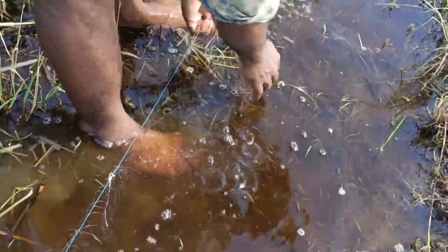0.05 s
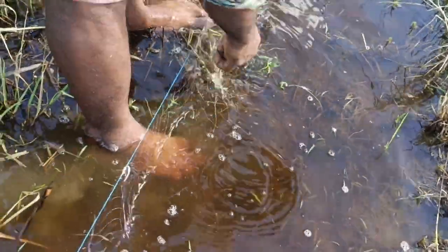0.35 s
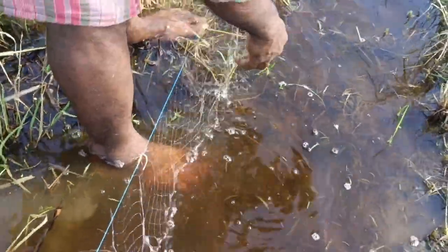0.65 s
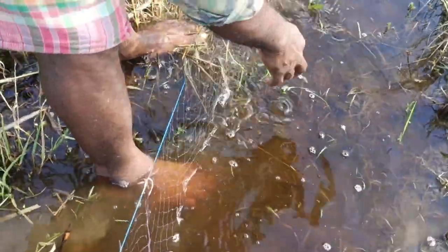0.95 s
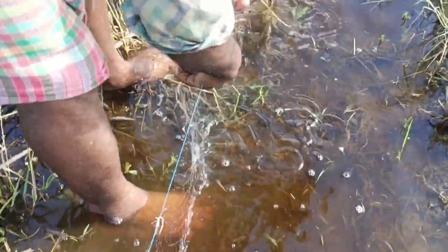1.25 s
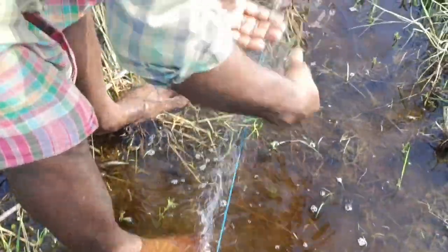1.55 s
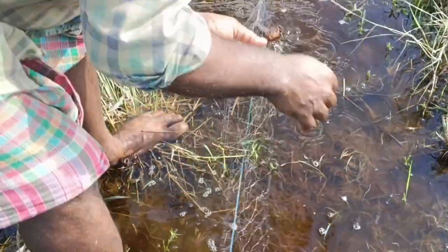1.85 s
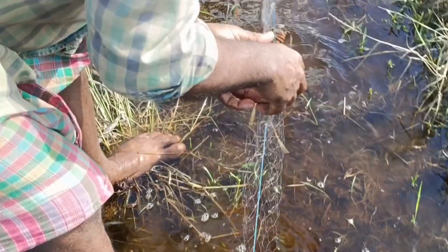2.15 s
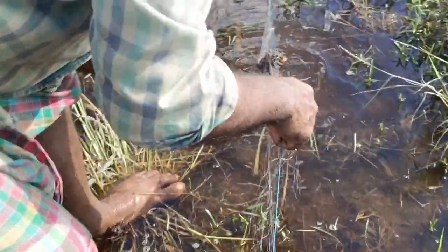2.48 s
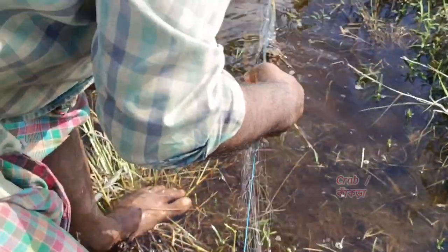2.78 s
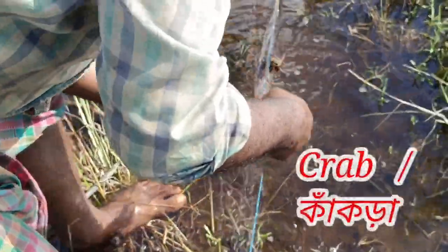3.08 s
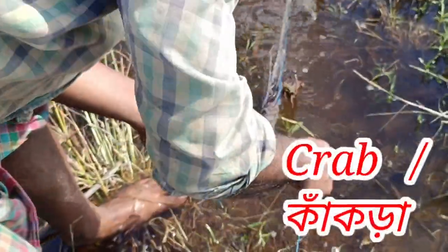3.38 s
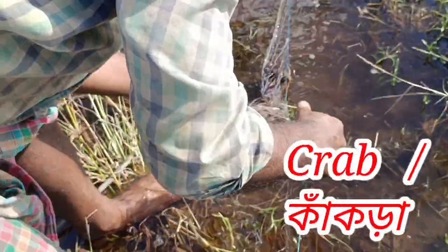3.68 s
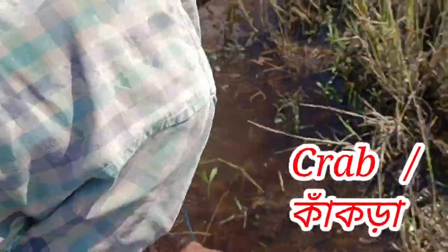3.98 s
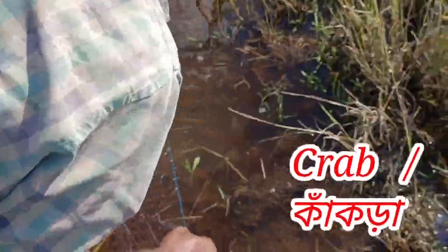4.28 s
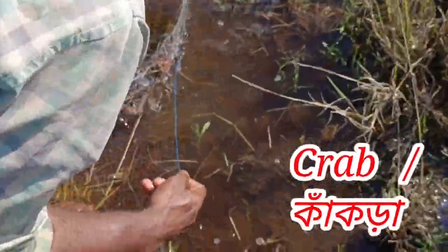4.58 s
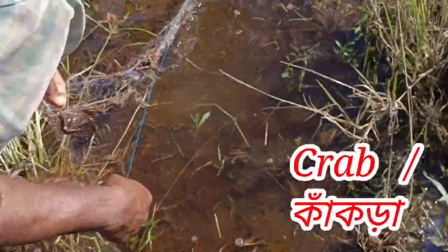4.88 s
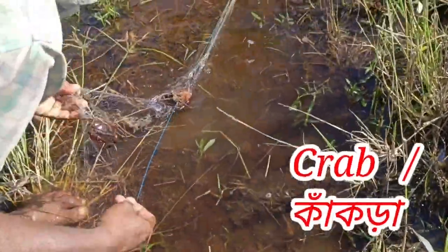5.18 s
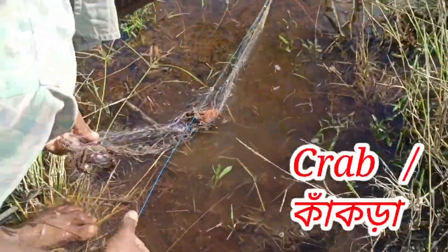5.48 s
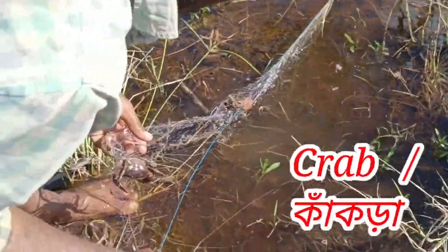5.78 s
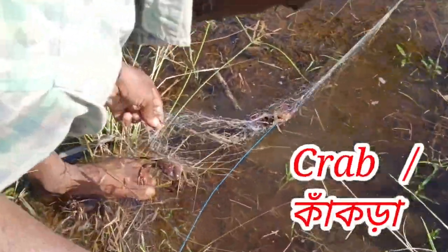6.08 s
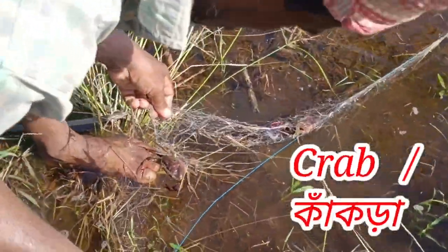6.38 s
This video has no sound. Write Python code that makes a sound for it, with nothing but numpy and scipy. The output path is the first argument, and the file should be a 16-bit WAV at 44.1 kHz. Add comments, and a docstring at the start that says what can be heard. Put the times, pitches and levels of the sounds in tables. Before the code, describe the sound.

Shallow water drips, plops and splashes as a fishing net is hauled by hand, then rustles over wet grass in light wind.

```python
"""Hauling a gill net through a flooded field

Water falls from the hand-hauled mesh, slaps the shallows and traps ringing bubbles;
later the net rustles over wet grass. An insect chirps in the reeds and another buzzes lower.
Light wind rumbles on the microphone, over a far hiss and a faint drone."""
import sys
import numpy as np
from scipy import signal
from scipy.io import wavfile
from scipy.ndimage import uniform_filter1d

SR = 44100
rng = np.random.default_rng(int(sys.argv[2]) if len(sys.argv) > 2 else 0)


def persist_wave(psi):
    """Save psi, clipped to +-1, as 16-bit WAV."""
    counts = np.round(np.clip(psi, -1, 1) * 32767).astype(np.int16)
    wavfile.write(sys.argv[1], SR, np.atleast_2d(counts).T)


N = 288414
TIME = np.arange(N) / SR

# Stereo likeness of airborne noise: (frequency [Hz], left-right correlation [-1..1])
AIR_CORRELATION = [(500, -0.13), (1400, -0.69), (3000, 0.17), (15000, -0.23)]
# Tugs that stir the water: (start [s], length [s], level [dB])
NET_TUGS = [(.42, 0.025, -57.5), (.62, 0.18, -65), (2.015, 0.01, -42), (2.725, 0.012, -40.5),
            (2.83, 0.02, -43.5), (3.81, 0.13, -50), (4.15, 0.09, -52.5), (4.635, 0.0054, -41.5),
            (4.772, 0.028, -48.5), (5.16, 0.091, -42), (5.87, 0.014, -44.5), (5.92, 0.2, -56),
            (6.285, 0.11, -37)]
# Lifts that shed spray and drips: (start [s], length [s], level [dB])
NET_LIFTS = [(.42, 0.091, -66), (.6, 0.44, -77), (1.92, 0.18, -55), (2.25, 0.7, -72), (2.8, 0.032, -65),
             (3.83, 0.165, -62), (4.22, 0.15, -60)]


def from_db(db):
    """Decibels to gain."""
    return 10 ** (np.asarray(db) / 20)


def rms_one(x):
    """Scale to unit rms."""
    return x / np.sqrt(np.mean(x ** 2) + 1e-20)


def at_hz(points, hz):
    """Interpolate a spectrum over log frequency."""
    points_hz, values = np.transpose(points)
    return np.interp(np.log(hz), np.log(points_hz), values)


def band(x, low_hz, high_hz, order=2):
    """Butterworth band-pass."""
    sos = signal.butter(order, [low_hz, min(high_hz, .45 * SR)], "band", fs=SR, output="sos")
    return signal.sosfilt(sos, x + 1e-18)


def drift(rate_hz):
    """Slow random wander, unit rms."""
    hop, settle = 40, 2000
    pole = np.exp(-2 * np.pi * rate_hz * hop / SR)
    white = rng.standard_normal(N // hop + settle + 2)
    slow = signal.lfilter([1], [1, -2 * pole, pole * pole], white)[settle:]
    return np.interp(np.arange(N) / hop, np.arange(len(slow)), rms_one(slow))


def pan(left_db):
    """Channel gains for a left-minus-right level."""
    return from_db(np.array([[left_db], [-left_db]]) / 2)


def add(out, start_s, sound):
    """Mix in a short sound."""
    i = int(np.clip(start_s * SR, 0, N - 1))
    out[..., i:i + sound.shape[-1]] += sound[..., :N - i]


def swell(start_s, length_s, rise_s, fall_s):
    """Rise, hold from start_s, fall; rise_s and fall_s are per 20 dB."""
    gain = np.zeros(N)
    on = (TIME > start_s - 3 * rise_s) & (TIME < start_s + length_s + 3 * fall_s)
    t = TIME[on] - start_s
    gain[on] = from_db(20 * (np.minimum(t, 0) / rise_s - np.maximum(t - length_s, 0) / fall_s))
    return gain


def swells(rows, rise_s, fall_s):
    """Summed swells from rows of (start [s], length [s], level [dB])."""
    return sum(from_db(db) * swell(s, length_s, rise_s, fall_s) for s, length_s, db in rows)


def activity(rows, rise_s, fall_s):
    """Vigour of the gestures: 1 in the strongest, dying to 0 between them."""
    top_db = max(db for _, _, db in rows)
    each = [from_db((db - top_db) / 2) * swell(s, length_s, rise_s, fall_s) for s, length_s, db in rows]
    return np.max(each, axis=0)


def coloured(spectrum, correlation, low_hz, high_hz, bands, flicker_db=0):
    """Unit-rms stereo noise; each band has its own level, correlation and optional flicker."""
    out = 0
    edges_hz = np.geomspace(low_hz, high_hz, bands + 1)
    white = rng.standard_normal((2, 2, N))
    for k, (low, high) in enumerate(zip(edges_hz, edges_hz[1:])):
        mid, side = band(white[k % 2], low, high)
        hz = np.sqrt(low * high)
        alike = np.clip(at_hz(correlation, hz), -1, 1)
        stereo = np.sqrt(1 + alike) * mid + np.sqrt(1 - alike) * side * [[1], [-1]]
        db = at_hz(spectrum, hz) + (flicker_db * drift(22) if flicker_db else 0)
        out = out + from_db(db) * stereo
    return rms_one(out)


def grains(per_s, spread_db):
    """Random clicks of uneven size and sign."""
    sizes = from_db(spread_db * np.minimum(rng.exponential(1, N), 4)) * rng.choice([-1, 1], N)
    return sizes * (rng.random(N) < per_s / SR)


def bubble(hz, t60_s, rise):
    """Trapped air swells within a cycle and rings; rise > 0 lifts the pitch as it nears the surface."""
    t = np.arange(int(max(t60_s, .002) * SR)) / SR
    envelope = (1 - np.exp(-t * hz / .7)) * from_db(-60 * (t / t60_s) ** 1.5)
    cycles = hz * (t + rise * t * (t / t60_s / 2 - .2))
    return envelope * np.sin(2 * np.pi * cycles)


def surroundings(x, left_db, bend_hz, scatter, tail, port_lag_s=.0001):
    """Sound bends round to the right microphone port, lagging; legs, water and reeds scatter it.
    scatter, tail: (level [dB], T60 [s])."""
    pole = np.exp(-2 * np.pi * bend_hz / SR)
    bent = signal.lfilter([-pole, 1], [1, -pole], x + 1e-18)  # all-pass
    direct = np.stack([x, np.interp(TIME - port_lag_s, TIME, bent)])
    t = np.arange(SR // 3) / SR
    response = 0
    for db, t60_s in scatter, tail:
        echoes = rng.standard_normal((2, len(t))) * from_db(-60 * t / t60_s) * (t > .0005)
        response = response + from_db(db) * rms_one(echoes) / np.sqrt(len(t))
    scattered = signal.fftconvolve(x[None], response, axes=1)[:, :N]
    return pan(left_db) * (direct + scattered)


def wind():
    """Eddies press on the two microphone ports; each gust favours one side."""
    # Eddy spectrum: (frequency [Hz], relative density [dB])
    spectrum = [(13, -36), (22, -15), (54, -3), (114, -2), (160, -9.5), (200, -7.5), (280, -11.5),
                (320, -14.5), (353, -18), (420, -22.5), (550, -57)]
    # Likeness at the ports: (frequency [Hz], left-right correlation [-1..1])
    correlation = [(30, 0.041), (70, 0.59), (130, 0.78), (300, 0.42)]
    # Breeze strength: (time [s], level [dB])
    breeze_curve = [(0.0, -54), (0.31, -44), (0.49, -49.5), (0.98, -42.5), (3.57, -46), (3.62, -44.5),
                    (3.88, -43), (4.77, -44.5), (4.9, -54.5), (4.97, -45.5), (5.23, -59), (5.39, -47.5),
                    (6.34, -47), (6.54, -53)]
    # Gusts on top: (start [s], length [s], level [dB], left minus right [dB])
    gust_rows = [(0.39, 0.056, -35.5, 1), (1.606, 0.012, -26.5, 16), (1.943, 0.071, -28.5, -30),
                 (2.267, 0.018, -30.5, -1), (2.347, 0.089, -33.5, -11), (2.668, 0.049, -36.5, -8),
                 (3.1, 0.093, -30, 9), (3.244, 0.38, -36, 6), (3.619, 0.032, -22.5, 30),
                 (3.73, 0.097, -35.5, 15), (4.541, 0.05, -35.5, -5), (4.731, 0.085, -34.5, -1.5),
                 (4.988, 0.03, -36.5, 2), (5.298, 0.0064, -35, 2), (5.777, 0.041, -32.5, 7),
                 (6.14, 0.037, -33.5, 25), (6.263, 0.21, -40.5, 4)]
    air = coloured(spectrum, correlation, 20.9, 416, bands=12)
    breeze = from_db(np.interp(TIME, *np.transpose(breeze_curve)))
    gusts = sum(from_db(db - 1.5) * rms_one(pan(left_db)) * swell(s, length_s, .046, .046)
                for s, length_s, db, left_db in gust_rows)
    rumble = np.hypot(gusts, breeze * from_db(3 * drift(14))) * rms_one(band(air, 30, 97.4, order=3))
    flutter = np.hypot(from_db(-14) * gusts, breeze) * rms_one(band(air, 113, 366.5, order=6))
    return rumble + flutter


def field(fade_db_per_s=.5):
    """Far hiss, slowly fading, under steady top hiss and a distant insect chorus."""
    # Far hiss spectrum: (frequency [Hz], relative density [dB])
    spectrum = [(400, 2), (520, -7), (700, -13.5), (1000, -13), (1500, -6.5), (1850, -10.5), (2250, -5.5),
                (2800, -14), (3600, -20.5), (5000, -34.5), (7000, -33)]
    air = coloured(spectrum, AIR_CORRELATION, 388, 7310, bands=16)
    air *= from_db(-56 - fade_db_per_s * TIME)
    top = rms_one(band(rng.standard_normal((2, N)), 12800, 24400))
    chorus = band(rng.standard_normal((2, N)), 8800, 9300, order=1)
    chorus = rms_one(band(chorus, 7800, 11000))
    return air * pan(2.1) + from_db(-70.5) * top + from_db(-64.5) * chorus * pan(4.1)


def drone(half_width_hz=6):
    """Two far, wavering low tones of narrow-band noise."""
    # Drone tones: (frequency [Hz], level [dB])
    tones = [(184, -56.5), (285, -60)]
    return sum(from_db(db) * rms_one(band(rng.standard_normal(N), hz - half_width_hz, hz + half_width_hz))
               for hz, db in tones)


def buzzing_insect():
    """Short rasps, pitched below the chirps."""
    # Rasps: (start [s], length [s], level [dB])
    rasps = [(0, 0.13, -71), (2.35, 0.11, -68), (3.72, 0.07, -72)]
    buzz = rms_one(band(rng.standard_normal((2, N)), 7800, 8400))
    return swells(rasps, rise_s=.043, fall_s=.04) * buzz * pan(15)


def chirping_insect(period_s=.1, duty=.78, strokes_per_s=137, top_hz=9350, fall_hz=858):
    """Each chirp is a run of wing strokes that glide down, blurred by the reeds."""
    # Phrases: (start [s], length [s], level [dB])
    trills = [(0.008, 0.92, -63), (0.912, 0.65, -62.5), (1.52, 0.42, -55), (2.21, 0.73, -68.5),
              (4.031, 0.27, -52.5)]
    chirps = 0
    for start_s, length_s, db in trills:
        singing = (TIME - start_s) / period_s % 1 < duty
        chirps = chirps + from_db(db) * swell(start_s, length_s, rise_s=.022, fall_s=.012) * singing
    stroke_phase = np.cumsum(strokes_per_s * (1 + .025 * drift(10))) / SR % 1
    hz = top_hz - fall_hz * stroke_phase + 70 * drift(300) + 45 * drift(8)
    wings = rms_one(np.sin(np.pi * stroke_phase) ** 2 * np.sin(2 * np.pi * np.cumsum(hz) / SR))
    waver_db = drift(1.4) + 2 * drift(52)
    song = uniform_filter1d(chirps, size=1100) * from_db(.5 + waver_db) * wings
    return surroundings(song, left_db=12, bend_hz=3000, scatter=(-4, .03), tail=(-10, .2))


def drips(idle_db=-55.5, moving_db=-40, spread_db=2.5, low_hz=1500, high_hz=4800):
    """Drops fall from the mesh, more and larger while it moves; each ticks and rings briefly."""
    out = np.zeros(N)
    t = np.arange(SR // 200) / SR
    lifted = activity(NET_LIFTS, rise_s=.06, fall_s=.22)
    tugged = activity(NET_TUGS, rise_s=.06, fall_s=.22)
    per_s = 3.4 + 190 * lifted + 120 * tugged
    level_db = idle_db + (moving_db - idle_db) * np.maximum(lifted, tugged)
    falls = np.flatnonzero(rng.random(N) < per_s / SR)
    for i, (size, pitch, ring) in zip(falls, rng.random((len(falls), 3))):
        hz = low_hz * (high_hz / low_hz) ** (pitch ** 1.3)
        gain = from_db(level_db[i] + spread_db * min(-np.log(1 - size), 3))
        cycles = 4 + 16 * ring
        tick = from_db(-22) * rng.standard_normal(len(t)) * np.exp(-t / .0004)
        add(out, TIME[i], gain * bubble(hz, cycles / hz, rise=ring / 2))
        add(out, TIME[i], gain * tick)
    return out


def spray():
    """The water film tears out of the lifted mesh in a fine crackle."""
    clicks = np.stack([grains(per_s=1400, spread_db=4) for _ in range(2)])
    crackle = rms_one(band(clicks, 3500, 14000, order=1))
    return swells(NET_LIFTS, rise_s=.26, fall_s=.24) * crackle * pan(1.9)


def slosh(per_s=1400, spread_db=8.5, low_hz=760, high_hz=3780):
    """Stirred water sheds a crowd of small rising bubbles; higher ones die sooner."""
    out = np.zeros(N)
    stir = swells(NET_TUGS, rise_s=.06, fall_s=.11)
    births_s = TIME[(rng.random(N) < per_s / SR) & (stir > from_db(-90))]
    for s, (size, pitch_a, pitch_b, ring, rise) in zip(births_s, rng.random((len(births_s), 5))):
        hz = low_hz * (high_hz / low_hz) ** ((pitch_a + pitch_b) / 2)
        db = spread_db * min(-np.log(1 - size), 3)
        cycles = 15 + 30 * ring
        add(out, s, from_db(db) * bubble(hz, cycles / hz, rise))
    running_rms = np.sqrt(uniform_filter1d(out ** 2, size=2048).clip(0) + 1e-6)
    return from_db(-4.5) * stir * out / running_rms


def washes(edge_ratio=1.51):
    """Falling sheets of water break into a dense crackle, each around one pitch."""
    # Collapsing sheets: (start [s], length [s], level [dB], centre [Hz])
    sheets = [(0.426, 0.062, -62, 2560), (2.007, 0.039, -37.5, 1840), (2.78, 0.017, -49.5, 3000),
              (2.845, 0.019, -35.5, 3000), (2.873, 0.034, -45, 2290), (3.81, 0.0067, -42, 1600),
              (4.162, 0.022, -49.5, 2270), (4.234, 0.0097, -48.5, 1740), (4.632, .015, -37.5, 2200),
              (4.755, 0.016, -50, 1390), (5.852, 0.028, -36, 2050), (5.993, 0.013, -43.5, 1710)]
    out = np.zeros(N)
    crackle = grains(per_s=3000, spread_db=3.5)
    for s, length_s, db, hz in sheets:
        wash = rms_one(band(crackle, hz / edge_ratio, hz * edge_ratio))
        out += from_db(db) * swell(s, length_s, rise_s=.016, fall_s=.01) * wash
    return out


def plops():
    """Large trapped bubbles ring one by one, gliding up or down."""
    # Bubbles: (time [s], pitch [Hz], level [dB], glide [share of pitch], ring to -60 dB [cycles])
    bubbles = [(0.485, 1610, -34, 4, 10.5), (0.981, 1500, -33, 0.2, 8), (1.958, 910, -35.5, -0.5, 45),
               (2.004, 1740, -25, -2, 27), (2.009, 857, -34.5, 0.1, 46), (2.02, 2240, -29, 1, 39),
               (2.028, 1050, -46, -1, 18), (2.039, 2110, -8, -0.24, 32), (2.092, 1430, -28.5, -0.5, 52),
               (2.101, 653, -36.5, 0.5, 30), (2.618, 1590, -32, 0.5, 53), (2.65, 1430, -37.5, -1.1, 31),
               (2.7214, 920, -27, .5, 22), (2.7373, 4150, -21.5, 0.5, 41), (2.713, 490, -36, 2.5, 14.6),
               (2.8183, 2400, -17, 1.7, 44), (2.823, 1440, -19, 0.7, 30), (2.828, 3650, -18.5, -2.5, 26),
               (2.845, 844, -24.5, -0.5, 13.4), (2.8672, 1420, -23, -0.6, 33.7),
               (2.885, 1490, -45, -0.2, 180), (3.8054, 887, -23.5, 0.43, 30), (3.814, 1950, -30, -1.5, 33),
               (3.833, 1760, -34, 2.5, 27), (3.86, 5850, -42, -1, 82), (3.899, 1640, -20, .1, 30),
               (3.911, 734, -34.5, 1, 17), (3.9339, 1247, -26, 0.56, 21), (3.941, 2060, -15, 1.5, 10.8),
               (3.991, 1780, -32, -0.5, 21), (4.013, 2720, -33, 0.1, 23), (4.028, 2840, -35.5, .1, 52),
               (4.135, 1530, -37.5, 1, 41), (4.178, 3230, -37, .3, 46), (4.182, 1500, -34, 0.2, 51),
               (4.216, 1080, -38.5, -0.9, 37), (4.236, 1210, -31, -1.5, 43), (4.363, 3530, -30.5, -0.5, 39),
               (4.457, 1406, -42, 0.5, 47), (4.47, 1155, -34.5, .1, 31), (4.637, 1580, -24, -2, 18),
               (4.667, 1570, -20.5, 0.3, 16), (4.789, 2400, -26, -1, 21), (5.151, 1750, -22, 0.4, 24.7),
               (5.252, 1148, -29.5, 0, 46), (5.873, 3840, -19, 0.9, 22), (5.875, 693, -34, 0, 22),
               (5.908, 2800, -23, 1.8, 17), (6.008, 1010, -32.5, -1.1, 6.4), (6.029, 1400, -26, 0, 25),
               (6.04, 1370, -31.5, -0.1, 32), (6.104, 1325, -39, 0.1, 37), (6.17, 1160, -40, 2.1, 18),
               (6.334, 1330, -28.5, 0.9, 28), (6.372, 780.7, -41, 1.1, 48), (6.435, 730, -41, 0, 42)]
    out = np.zeros(N)
    for s, hz, db, rise, cycles in bubbles:
        add(out, s, from_db(db - 2) * bubble(hz, cycles / hz, rise))
    return out


def slaps(crack_s=.00051, spit_s=.004):
    """Drops and wet mesh hit the water: a sharp crack, a short ring, a spit of spray."""
    # Impacts: (time [s], level [dB], ring centre [Hz], relative snap gain [dB])
    impacts = [(0.4862, -26, 2800, -26), (0.599, -43, 2590, -17), (0.64, -35, 2420, -19),
               (0.798, -29, 9900, -7.5), (0.9818, -36, 1900, -21), (1.035, -41, 3730, -19),
               (1.222, -43, 4970, 8), (1.855, -31, 4200, -7), (1.8974, -23.5, 2940, -15.5),
               (1.939, -29, 8400, -8), (1.994, -20.5, 8700, 1), (1.999, -12.5, 8500, -9),
               (2.004, -21, 4500, 7), (2.047, -29, 4660, -22), (2.095, -32.5, 1550, -5),
               (2.101, -47, 4270, -22), (2.123, -26, 7660, -7), (2.128, -27.5, 5600, -26.5),
               (2.163, -27.5, 6400, -37), (2.173, -32, 5370, -4), (2.294, -36, 9930, -19),
               (2.344, -37, 7400, -28), (2.7138, -18, 4000, -5.5), (2.7333, -22, 4000, -21),
               (2.7614, -14.5, 5100, -6), (2.761, -17.5, 1700, -32), (2.819, -16, 2500, -42),
               (2.844, -18, 2930, -6), (2.8494, -15, 5870, -36), (2.8596, -13.5, 3830, -6.5),
               (2.9774, -41.5, 8200, -25), (3.7963, -25, 5830, -42), (3.808, -32, 5240, -35.5),
               (3.815, -29, 5340, -23.5), (3.847, -28.5, 11000, 0), (3.859, -27.5, 6260, -15),
               (3.934, -29, 2018, -14), (3.939, -31, 4440, -29), (3.9524, -27.5, 3760, -30),
               (3.969, -21.5, 10200, 2), (3.973, -26.5, 3880, -17), (4.0155, -30.5, 10440, -1),
               (4.0606, -33.5, 3640, -27), (4.1238, -46, 4970, -10), (4.2311, -36, 6100, -25.5),
               (4.2895, -39, 5240, -4.5), (4.2097, -24, 5970, -35), (4.2384, -26, 2400, -16),
               (4.331, -29, 6520, -22), (4.359, -28, 4650, -2), (4.501, -15.5, 3830, 0.5),
               (4.637, -19, 2650, -13), (4.653, -21, 3630, -24), (4.774, -23, 1899, -11.5),
               (5.022, -32.5, 3900, -12), (5.162, -31, 9800, -21), (5.252, -25.5, 3930, -29),
               (5.3015, -29, 1900, -42), (5.415, -36, 8850, 1), (5.883, -21, 3380, -25),
               (5.89, -24.5, 6560, -20), (5.977, -26.5, 3520, -31), (6.009, -23.5, 3880, -5),
               (6.019, -21.5, 3700, -34), (6.0356, -11, 5040, -3), (6.292, -22.5, 3630, -36),
               (6.507, -26.5, 3800, -16.5)]
    out = np.zeros(N)
    t = np.arange(SR // 30) / SR
    envelope = np.exp(-t / crack_s) + from_db(-15) * np.exp(-t / spit_s)
    for s, db, hz, snap_db in impacts:
        crack = rng.standard_normal(len(t)) * envelope
        ring = band(crack, hz / 1.18, hz * 1.18)
        snap = from_db(snap_db) * band(crack, 4000, 12000)
        body = from_db(-12.5) * band(crack, 1900, 6000)
        hit = ring + snap + body
        add(out, s, from_db(db - 1.5) * hit / np.abs(hit).max())
    return out


def gurgles():
    """A cavity shrinks as water closes over it, so its note swells and climbs."""
    # Air pockets: (start [s], length [s], first pitch [Hz], last pitch [Hz], level [dB])
    pockets = [(2.124, 0.024, 910, 1810, -39), (2.712, 0.024, 421, 1325, -37),
               (2.734, 0.012, 1290, 2670, -33), (2.776, 0.016, 960, 1590, -44),
               (2.851, 0.012, 2277, 3700, -28), (3.905, 0.017, 1880, 2790, -52),
               (5.886, 0.0365, 566, 1260, -50), (5.902, .034, 1240, 2000, -49),
               (6.255, 0.035, 642, 798, -48.5), (6.272, 0.025, 1680, 2276, -34.5)]
    out = np.zeros(N)
    for s, length_s, first_hz, last_hz, db in pockets:
        age = np.linspace(0, 1, int(length_s * SR))
        hz = first_hz * (last_hz / first_hz) ** age
        add(out, s, from_db(db) * np.sin(np.pi * age) * np.sin(2 * np.pi * np.cumsum(hz) / SR))
    return out * from_db(2 * drift(90))


def close_reflection(x, delay_s=.000408, gain=.55):
    """An inverted echo with a wandering delay hollows the sound."""
    late_s = TIME - delay_s * (1 + .02 * drift(1))
    return x - gain * np.stack([np.interp(late_s, TIME, channel) for channel in x])


def net_rustle():
    """Wet mesh slides over grass: countless tiny slips hiss, strands flicking past stalks crackle."""
    # Slip spectrum: (frequency [Hz], relative density [dB])
    spectrum = [(700, -8), (1300, -9.5), (2100, -0.5), (2700, -1.5), (3700, 3), (4900, 7.5), (6000, 4),
                (7200, 10), (8700, 9), (12000, 4.5), (15500, 3.5)]
    # Sliding speed as rustle level: (time [s], level [dB])
    pull_curve = [(4.37, -64), (4.43, -68.5), (4.49, -53.5), (4.57, -50), (4.65, -50.5), (4.75, -59),
                  (4.8, -51.5), (4.87, -59.5), (4.92, -54.5), (5.0, -56), (5.06, -72), (5.14, -73),
                  (5.17, -62.5), (5.31, -62), (5.34, -71), (5.51, -65), (5.54, -58), (5.69, -53.5),
                  (5.74, -50.5), (5.87, -49), (5.96, -54), (6.03, -58), (6.08, -62.5), (6.13, -60),
                  (6.25, -56), (6.35, -49.5), (6.44, -49.5), (6.54, -48.5)]
    slips = close_reflection(coloured(spectrum, AIR_CORRELATION, 710, 16460, bands=22, flicker_db=2.4))
    snags = uniform_filter1d(np.abs(grains(per_s=250, spread_db=4)), size=48)
    slips = slips * np.sqrt(1 + .5 * rms_one(snags).clip(0)) * from_db(.39 * drift(21))
    flicks = sum(band(grains(per_s=22, spread_db=4), hz / 1.1, hz * 1.1, order=1) / np.sqrt(hz)
                 for hz in np.geomspace(3500, 13000, 8))
    scrape = from_db(3.5) * band(slips, 870, 8840) / band(slips, 3240, 5100).std()
    hiss = from_db(7) * band(slips, 6520, 22000) / band(slips, 10980, 14100).std()
    pull = from_db(np.interp(TIME, *np.transpose(pull_curve), left=-120))
    return pull * (scrape * pan(6.7) + (hiss + rms_one(flicks)) * pan(4.7))


def scene():
    """Water close on the left, over net, insects and wind."""
    bubbles = surroundings(plops() + gurgles(), left_db=7, bend_hz=2200,
                           scatter=(-8, .035), tail=(-17, .12))
    splashes = surroundings(slaps() + washes(), left_db=7.5, bend_hz=3000,
                            scatter=(-5, .022), tail=(-13, .14))
    stirred = surroundings(slosh() + drips(), left_db=6, bend_hz=750,
                           scatter=(-4, .05), tail=(-12, .12))
    water = bubbles + splashes + stirred + spray()
    return water + net_rustle() + chirping_insect() + buzzing_insect() + field() + drone() + wind()


def record(dry):
    """Steep elliptic low-pass."""
    cutoff_hz = 15550
    return signal.sosfilt(signal.ellip(10, .1, 70, cutoff_hz, fs=SR, output="sos"), dry)


dry = scene()
out = record(dry)
persist_wave(out)
```